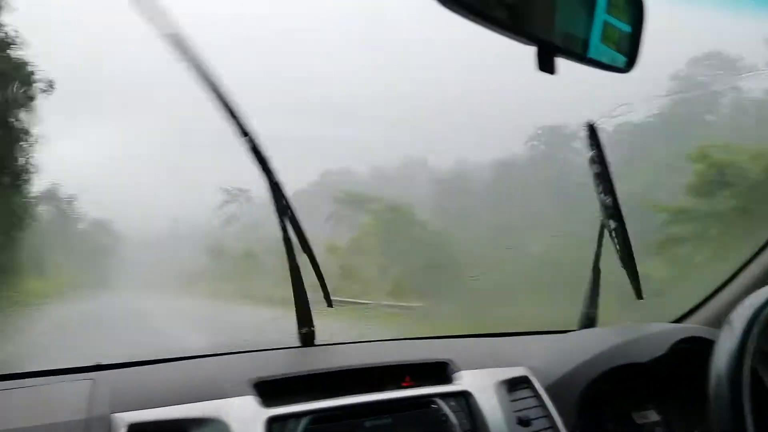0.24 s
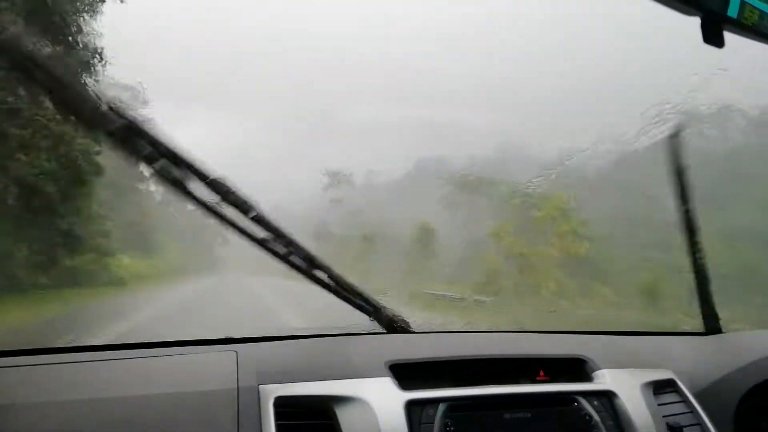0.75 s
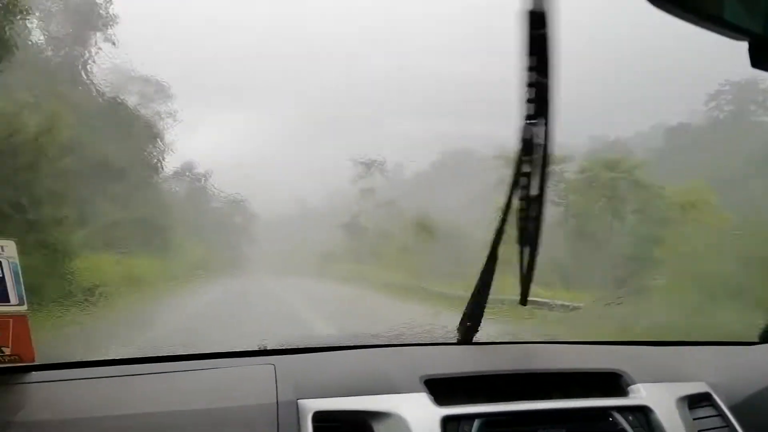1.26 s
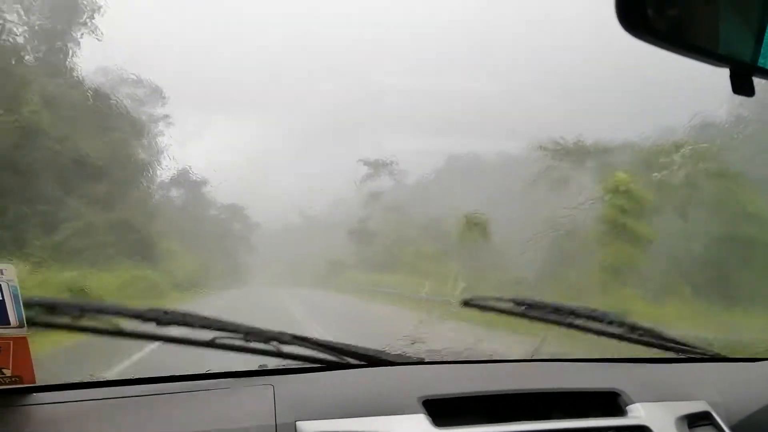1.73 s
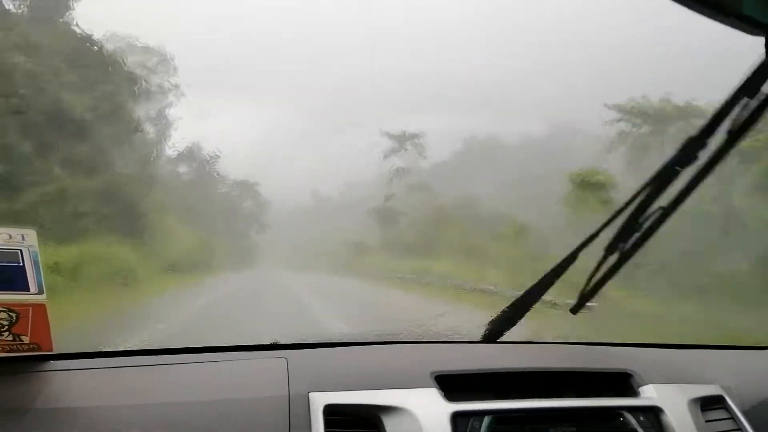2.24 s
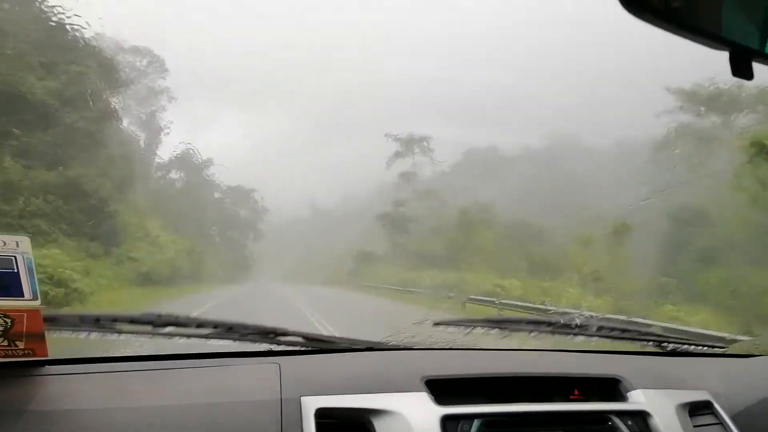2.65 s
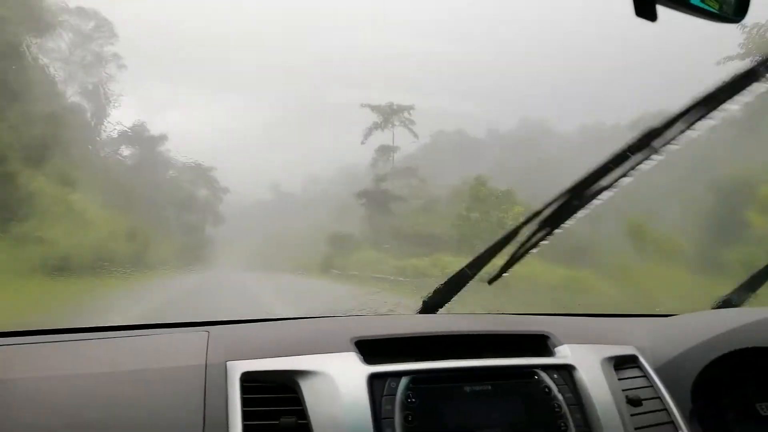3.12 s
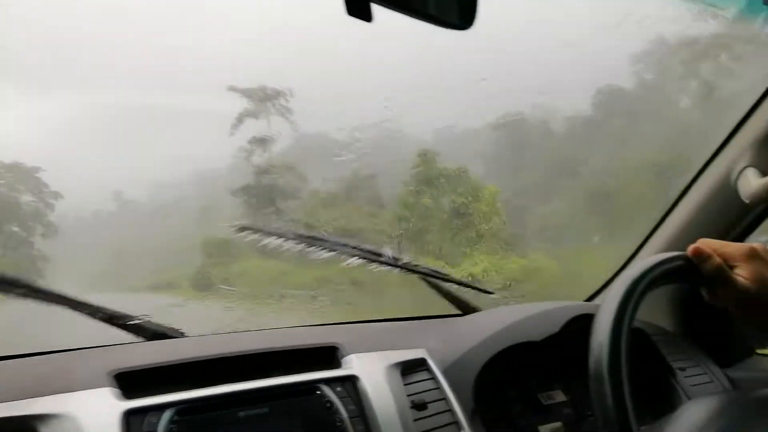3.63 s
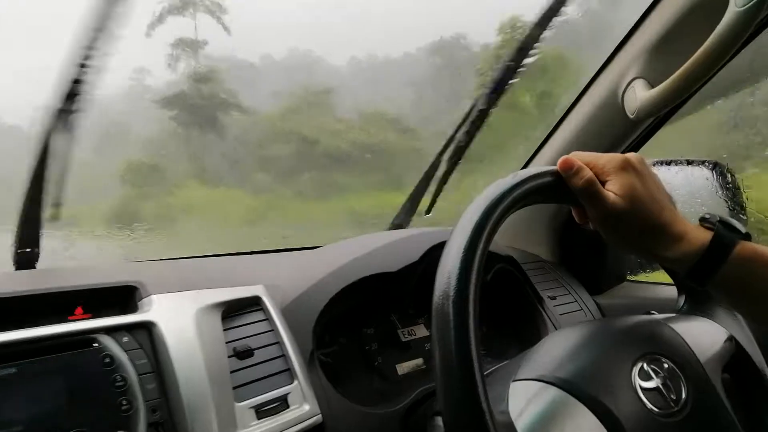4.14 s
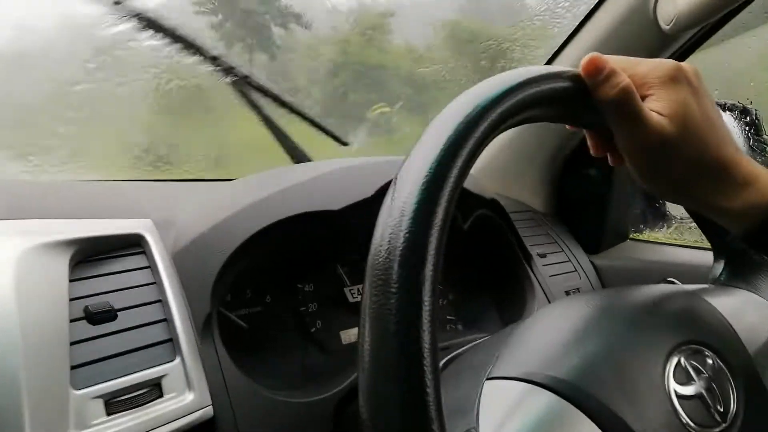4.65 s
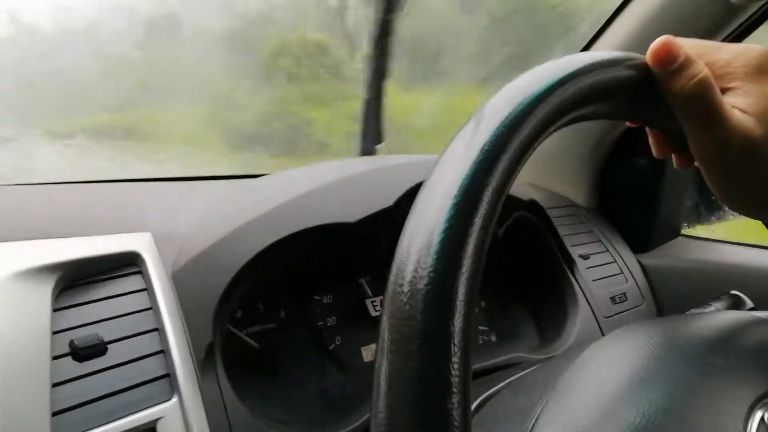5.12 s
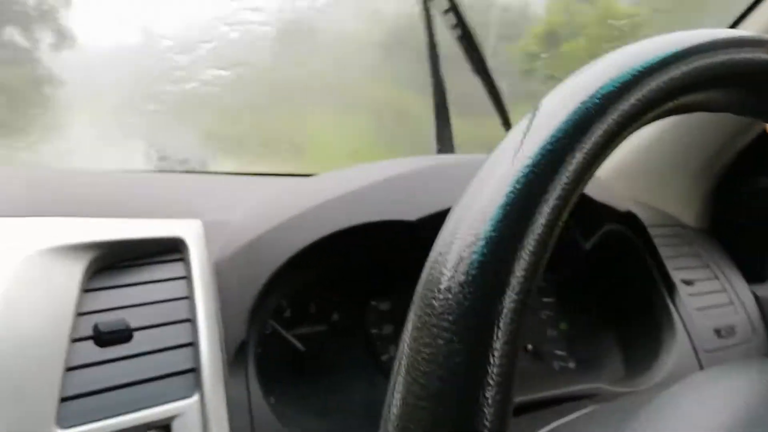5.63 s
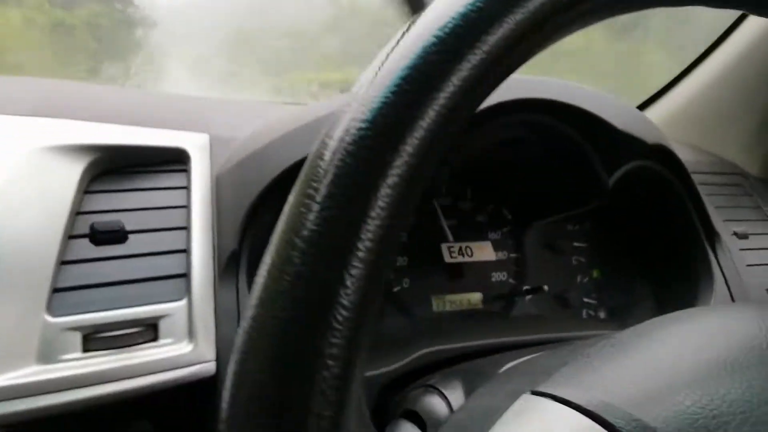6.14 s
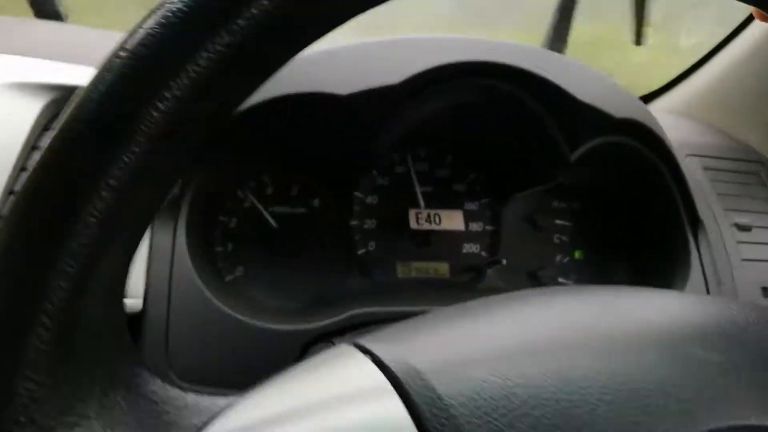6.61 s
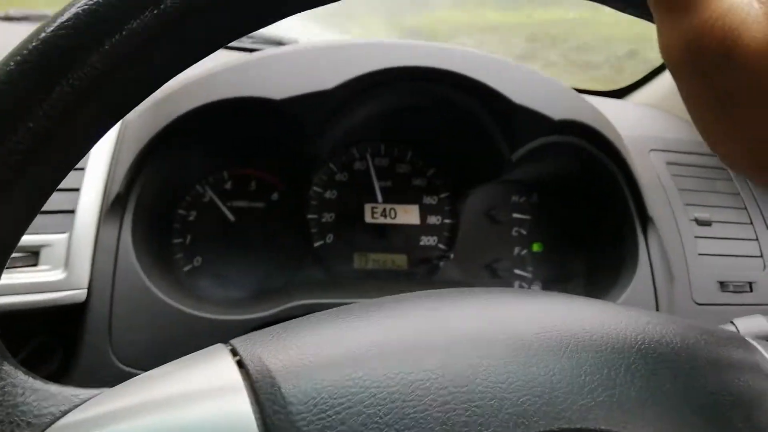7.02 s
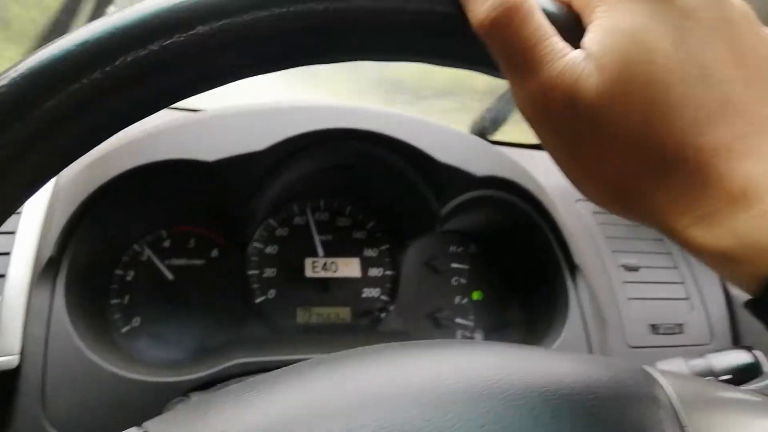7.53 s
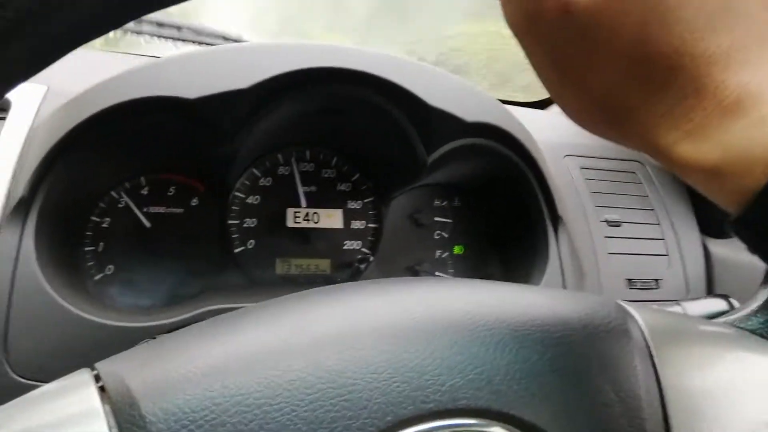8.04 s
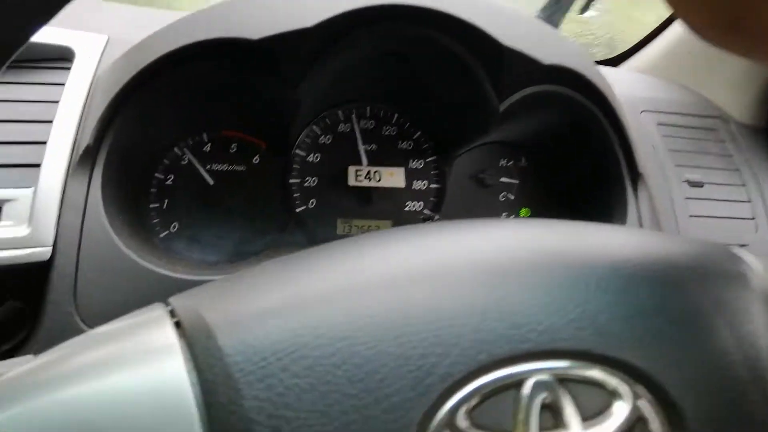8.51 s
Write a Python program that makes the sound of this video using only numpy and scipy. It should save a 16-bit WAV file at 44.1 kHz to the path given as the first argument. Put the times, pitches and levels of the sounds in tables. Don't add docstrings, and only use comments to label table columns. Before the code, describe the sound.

Cloudburst drumming hard on a car's roof and windscreen, heard inside over a steady low engine boom and soft wet-road tyre rumble.

```python
import sys
import numpy as np
from scipy import signal
from scipy.fft import rfft, irfft, next_fast_len
from scipy.io import wavfile
from scipy.ndimage import uniform_filter1d

SR = 44100
rng = np.random.default_rng(int(sys.argv[2]) if len(sys.argv) > 2 else 0)


def store_wav(level_fs):
    pcm = np.round(np.clip(np.atleast_2d(level_fs), -1, 1) * 32767)
    wavfile.write(sys.argv[1], SR, pcm.T.astype(np.int16))


def gain_from_db(level_db):
    decades = np.asarray(level_db, float) / 20
    return 10 ** decades


N = 386757
SIZE = next_fast_len(N + SR)
HZ = np.fft.rfftfreq(SIZE, 1 / SR)
TIME = np.arange(N) / SR


def level(x, db):
    return x * gain_from_db(db) / np.sqrt(np.mean(x ** 2))


def curve(table):
    s, *columns = np.transpose(table)
    return [np.interp(TIME, s, column) for column in columns]


def shape(hz, db):
    return gain_from_db(np.interp(np.log(HZ + 1), np.log(hz), db))


def band(lo_hz, hi_hz):
    return 1 / np.sqrt((1 + (lo_hz / (HZ + 1)) ** 8) * (1 + (HZ / hi_hz) ** 8))


def bell(x, centre, width):
    return np.exp(-(2 * (x - centre) / width) ** 2)


def walk(rate_hz):
    hold = int(SR / rate_hz)
    x = np.repeat(rng.standard_normal(N // hold + 1), hold)
    x = uniform_filter1d(uniform_filter1d(x, hold), hold)[:N]
    return x / x.std()


# centre_hz, glass_left_db, glass_right_db, dash_left_db, dash_right_db
RAIN_COLOUR = [(278, -8, -8.5, -5, -8), (427, -10.5, -13, -6.5, -3), (564, -11.5, -13, -13, -13.5),
               (1080, -12, -12, -10.5, -9), (1364, -11, -11, -8.5, -7), (1690, -4.5, -3.5, -6, -1.5),
               (2040, -4, -5, -7, 2), (2440, -8, -9.5, -6.5, -3), (3030, -10.5, -14, -11, -12),
               (3660, -14.5, -11.5, -13.5, -15.5), (5400, -16, -15, -15, -14.5),
               (7600, -18, -17.5, -20.5, -16), (10700, -21, -22.5, -19.5, -22),
               (13200, -31.5, -35, -30.5, -32.5)]
# centre_hz, width_hz, glass_left_db, glass_right_db, dash_left_db, dash_right_db
DUCTS = [(546, 110, -2, -3.5, -1.5, -1.5), (730, 120, 2, 2, 2.5, 4), (2640, 690, 1.2, -0.5, 0, .3),
         (3620, 630, 4, 1, 1, 2.5), (6430, 780, -5.5, -5, -2, -2), (8420, 1120, -5, -5, -6, -4.5),
         (9430, 1400, -9.5, -1, -6.5, 2.5), (14700, 1100, -5, -2, -7, -7)]
# time_s, share_turned_to_dashboard
SWING = [
    (0, 0),
    (3.6, 0.25),
    (4.6, 0.38),
    (5.4, 0.36),
    (6.4, 0.9),
    (8.77, 0.97),
]


def rain():
    trim_db, usual_drum_db, follow, lean = 9.5, 2.5, 0.82, 4.5
    turned = np.clip(curve(SWING)[0], 0, 1)
    hiss_db, drum_db, centre_hz, pan_db = downpour()
    hz, *colours = np.transpose(RAIN_COLOUR)
    ports = drumming(hiss_db)
    drum = band(1340, 2860)
    slope = drum * np.log(HZ / 2000 + 1e-9)
    slide = lean * np.log(centre_hz / centre_hz.mean())
    out = np.zeros((2, N))
    for port, way in enumerate((1, -1)):
        for share, case, pose_db in ((1 - turned, port, 0), (turned, port + 2, 1.8)):
            ducts_db = sum(db[case] * bell(HZ, centre, width) for centre, width, *db in DUCTS)
            sound = ports[port] * shape(hz, colours[case]) * gain_from_db(ducts_db) * band(224, 15200)
            swell = gain_from_db(follow * (drum_db - usual_drum_db - pose_db)) - 1
            heard = irfft(sound, SIZE)[:N]
            heard += swell * irfft(sound * drum, SIZE)[:N]
            heard += slide * irfft(sound * slope, SIZE)[:N]
            out[port] += share * heard
        out[port] *= gain_from_db(way * (pan_db - pan_db.mean()) / 2)
    return level(out, trim_db) * gain_from_db(hiss_db)


# time_s, hiss_db
RAIN_LEVEL = [(0.0, -32.5), (0.4, -33.5), (0.65, -33), (1.4, -34.5), (1.65, -33.5), (2.8, -34),
              (3.0, -33.5), (3.4, -34), (4.0, -33.5), (4.45, -32.6), (4.74, -34.2), (4.9, -33), (5.45, -32),
              (5.66, -32), (5.76, -34.5), (5.9, -33), (6.6, -34), (8.77, -33.5)]
# time_s, closeness (0-1), drum_centre_hz
CLOSENESS = [(0, 0.02, 1950), (1.4, 0.1, 1950), (3.6, 0.12, 1950), (4.7, 0, 1890), (5.2, 0, 2000),
             (5.75, 0.1, 1870), (6, 0.6, 1920), (6.4, 0.4, 2030), (6.75, .75, 2130), (7.1, 0.6, 2100),
             (7.5, 1, 2150), (7.9, 0.2, 2040), (8.5, .55, 2020), (8.77, .8, 2020)]


def downpour():
    far_drum_db, close_drum_db, far_pan_db, close_pan_db = 1.03, 5, 0.5, 1.6
    close, centre_hz = curve(CLOSENESS)
    close = np.clip(close, 0, 1)
    drum_db = far_drum_db + (close_drum_db - far_drum_db) * close + 0.25 * walk(6)
    pan_db = far_pan_db + (close_pan_db - far_pan_db) * close + 0.4 * walk(5)
    return curve(RAIN_LEVEL)[0], drum_db, centre_hz + 30 * walk(8), pan_db


# time_s, peak_db, left_minus_right_db
SPLATS = [(0.0184, -21, 2), (0.5018, -23, 4), (0.7981, -26, -2), (1.2274, -24, 0.0), (1.8073, -27, -4),
          (2.174, -26, 2), (2.4981, -18, 3), (2.5735, -26, -5), (2.793, -37, -4), (2.9073, -23, -1),
          (4.0208, -22, -1.0), (4.81, -19, 2), (5.3443, -20, -4), (5.3932, -21, -0.5), (5.65, -18, 2),
          (5.841, -26, -1.0), (5.9698, -19, -2.5), (6.5221, -28, 0.0), (7.237, -20, 1.5), (8.3444, -27, -2),
          (8.521, -18, 1.5), (8.5754, -25, 2), (8.6383, -19, -1), (8.6888, -19, 2)]


def drumming(hiss_db):
    drops_per_s, panels = 9000, 9
    spread_db, biggest, gust_db, splat_db = 3.0, 4.7, 0.38, 10.0
    apart_s, shade_db = 0.00099, 3.7
    slap_s, ring_s, ping_s = 0.0012, 0.067, 0.049
    wet_db, ping_db, soft = -9.5, -13, 0.6
    when, panel, side, size, sign = rng.random((int(drops_per_s * N / SR), 5)).T
    when = (when * N).astype(int)
    gusts_db = gust_db * (0.66 * walk(12) + 1.47 * walk(30))
    size_db = spread_db * np.minimum(-np.log(1 - size), biggest) + gusts_db[when]
    heavy_s, heavy_db, heavy_pan_db = np.transpose(SPLATS)
    heavy_when = (heavy_s * SR).astype(int)
    when = np.r_[when, heavy_when]
    size_db = np.r_[size_db, splat_db + heavy_db - hiss_db[heavy_when]]
    side = np.sign(side - 0.5) * np.abs(2 * side - 1) ** 0.82
    side = np.r_[side, np.clip(heavy_pan_db / 4, -1, 1)]
    panel = np.r_[(panel * panels).astype(int), np.full(len(SPLATS), panels)]
    sign = np.r_[np.sign(sign - 0.5), np.ones(len(SPLATS))]
    t = np.arange(SR // 5) / SR
    ports, total = np.zeros((2, len(HZ)), complex), 0
    for k in range(panels + 1):
        slap, tail = rng.standard_normal((2, len(t)))
        tail *= gain_from_db(wet_db) * np.exp(-np.log(1000) * t / ring_s)
        mode_hz = 1500 + 1100 * rng.random((3, 1))
        pings = np.sin(2 * np.pi * mode_hz * t).sum(axis=0)
        tail += gain_from_db(ping_db) * pings * np.exp(-np.log(1000) * t / ping_s)
        tail = signal.lfilter([1 - soft], [1, -soft], tail)
        ring = rfft(slap * np.exp(-t / slap_s) + tail, SIZE)
        total = total + np.abs(ring) ** 2
        if k == panels:
            ring *= band(3100, 16000)
        hit = panel == k
        for port, way in enumerate((-1, 1)):
            lag = np.round(way * side[hit] * apart_s * SR / 2).astype(int)
            at = np.clip(when[hit] + lag, 0, N)
            weight = sign[hit] * gain_from_db(size_db[hit] - way * shade_db * side[hit])
            ports[port] += rfft(np.bincount(at, weight, SIZE)) * ring
    return ports / np.sqrt(uniform_filter1d(total, size=600))


# time_s, firing_hz, boom_db
REVS = [(0.0, 109.4, -12), (0.08, 109.4, -13), (0.17, 109.4, -15), (0.27, 109.3, -12.3), (1.1, 109.3, -12),
        (1.3, 109.4, -12.5), (2.3, 108.6, -12), (3.4, 109, -11.5), (3.75, 109.5, -13), (4.7, 107, -12.2),
        (5.15, 106.2, -13), (5.45, 106.6, -14.5), (6.25, 106.7, -13.5), (7.3, 106.6, -14.3),
        (7.8, 106.7, -13.5), (8.2, 106.9, -14.5), (8.6, 107.5, -15.2), (8.77, 107.7, -13)]
# multiple_of_firing, cruising_db, easing_off_db, pulling_db (re boom)
ORDERS = [(1.5, -19, -39, -25), (1.75, -42, -33.5, -23), (2, -31.5, -23.5, -27.5),
          (2.25, -25.5, -29.5, -35), (3, -48, -26, -28), (3.25, -58.5, -37, -37), (3.625, -36, -38, -44),
          (4.125, -44, -40, -37), (4.5, -34.5, -46, -40)]
# time_s, stage (0 cruising, 1 easing off, 2 pulling again)
THROTTLE = [
    (0, 0),
    (3.6, 0),
    (4.5, 1),
    (6, 1),
    (7, 2),
    (8.77, 2),
]


def engine():
    lead_s = 0.00032
    firing_hz, boom_db = curve(REVS)
    stage = curve(THROTTLE)[0]
    phase = 2 * np.pi * np.cumsum(firing_hz + 0.073 * walk(12)) / SR
    out = np.zeros((2, N))
    for multiple, *stage_db in [(1, 0, 0, 0)] + ORDERS:
        start = 2 * np.pi * rng.random()
        waver_db = 0.28 * walk(25) if multiple == 1 else 1.0 * walk(2.52)
        line_db = np.interp(stage, range(3), stage_db)
        gain = np.sqrt(2) * gain_from_db(boom_db + line_db + waver_db)
        lead = np.pi * multiple * 108 * lead_s * np.array([[1], [-1]])
        out += gain * np.sin(np.round(8 * multiple) / 8 * phase + start + lead)
    return out


# centre_hz, density_db
TREAD = [(20, -2), (32, -8), (50, -2), (80, -5.5), (115, -6), (134, -.5), (152, -7), (188, -6.5),
         (225, -14.5), (300, -23), (390, -23), (480, -25.5), (540, -40), (800, -28.5)]


def tyres():
    rumble_db, apart_s, follow = -25.5, 0.00083, 0.59
    swell_db = np.interp(curve(THROTTLE)[0], range(3), (0.1, -4.5, -1.5)) + 2.5 * walk(14)
    noise = rfft(rng.standard_normal((2, SIZE)))
    mid, side = noise * shape(*np.transpose(TREAD)) * band(13, 1040)
    alike = np.sinc(2 * HZ * apart_s)
    mid, side = mid * np.sqrt(1 + alike), side * np.sqrt(1 - alike)
    rumble = irfft([mid + side, mid - side], SIZE)[:, :N]
    return level(rumble, rumble_db) * gain_from_db(follow * (swell_db - swell_db.mean()))


# time_s, thud_db, length_s
BUMPS = [(2.9, -30, .12), (3.9, -30, .12), (4.33, -29, 0.078), (5.058, -25, .12), (5.37, -27, .08),
         (6.031, -29, .08), (6.2, -28, .06), (6.42, -22, .22), (6.6, -27, .1), (6.839, -25, .08),
         (7.06, -27, .08), (7.85, -30, .12), (8.38, -28, .08), (8.53, -25, 0.072), (8.66, -28, .08)]


def suspension():
    thud = gain_from_db(-41 + 1.5 * walk(14))
    for s, db, length_s in BUMPS:
        thud = thud + gain_from_db(db) * bell(TIME, s, length_s)
    return body(67, 1.7, 20 * np.log10(thud))


def sway():
    return body(37, 1.58, -26.5 + 3.5 * walk(11))


def body(hz, wander_hz, db):
    phase = 2 * np.pi * np.cumsum(hz + wander_hz * walk(9)) / SR
    return np.sqrt(2) * gain_from_db(db + 2.05 * walk(22)) * np.sin(phase)


def scene():
    return rain() + engine() + tyres() + suspension() + sway()


def low_pass(x):
    return signal.sosfilt(signal.butter(12, 15100, fs=SR, output="sos"), x)


def record(dry):
    return low_pass(dry)


dry = scene()
out = record(dry)
store_wav(out)
```